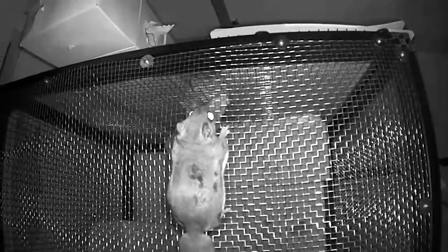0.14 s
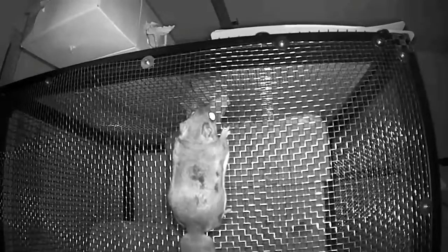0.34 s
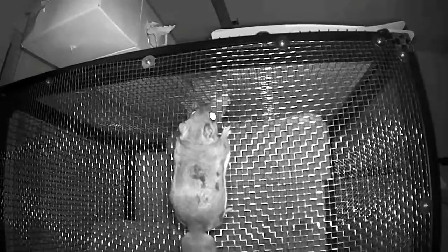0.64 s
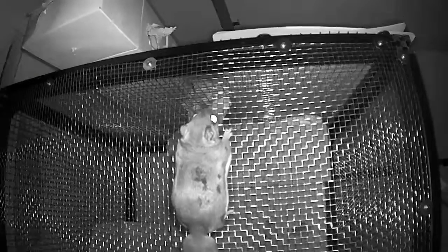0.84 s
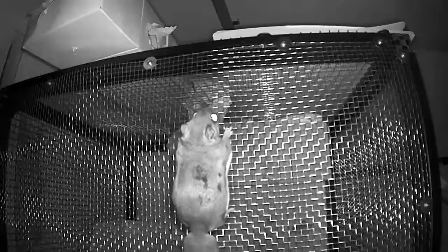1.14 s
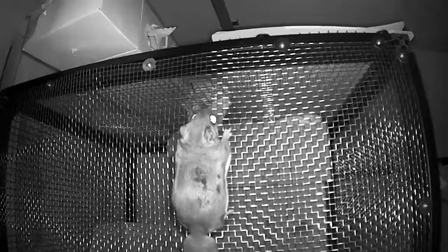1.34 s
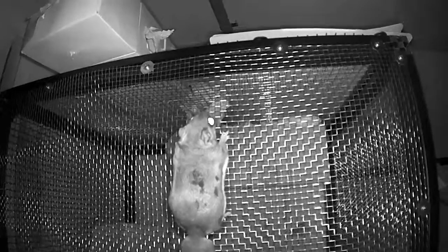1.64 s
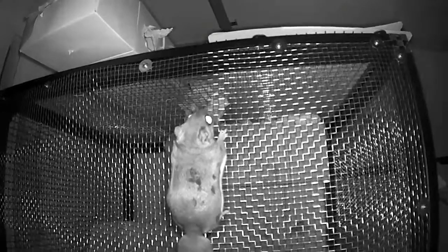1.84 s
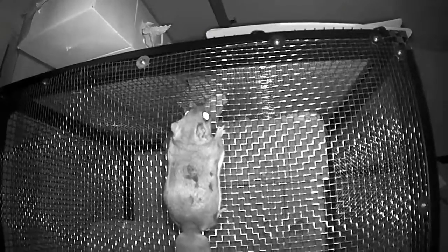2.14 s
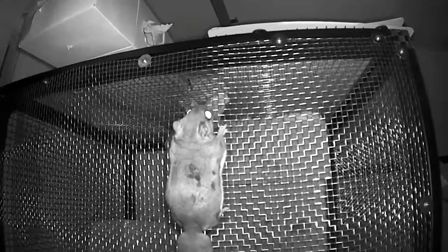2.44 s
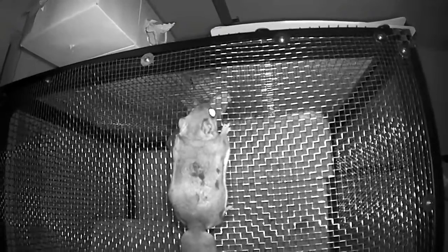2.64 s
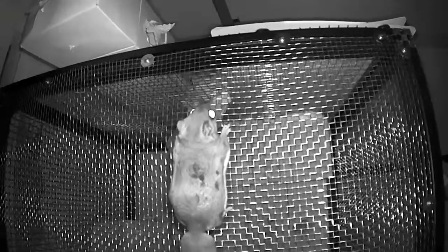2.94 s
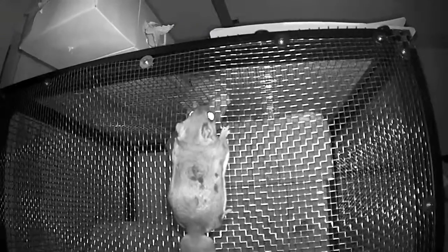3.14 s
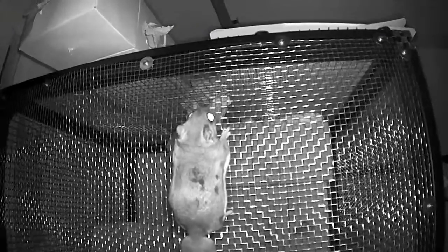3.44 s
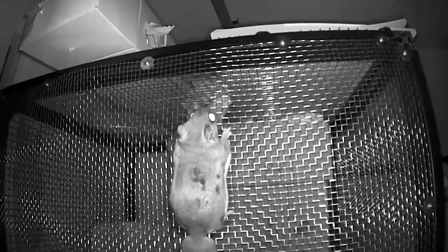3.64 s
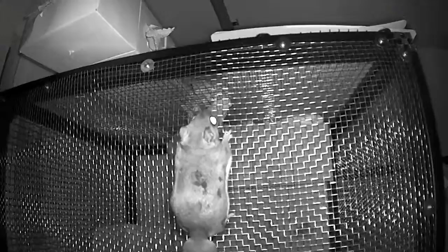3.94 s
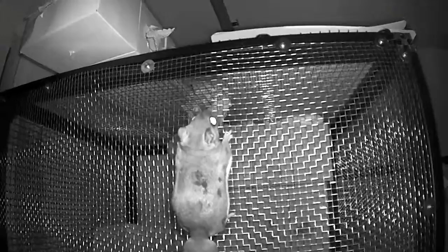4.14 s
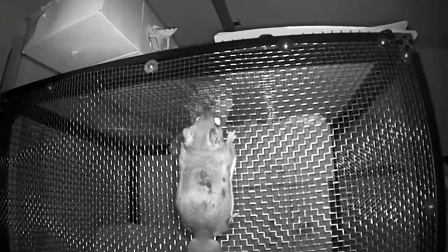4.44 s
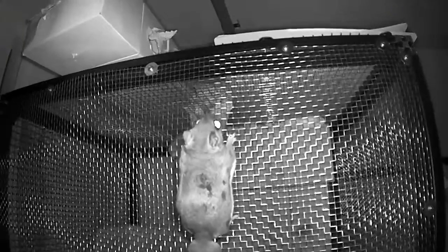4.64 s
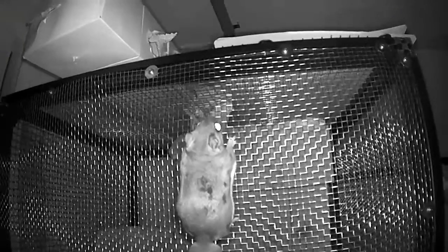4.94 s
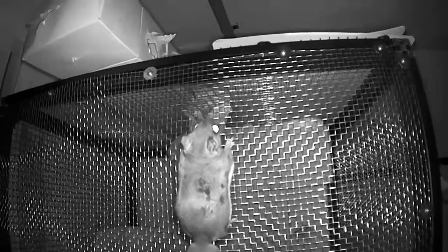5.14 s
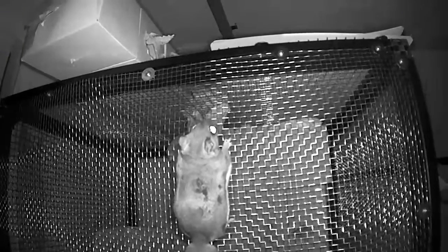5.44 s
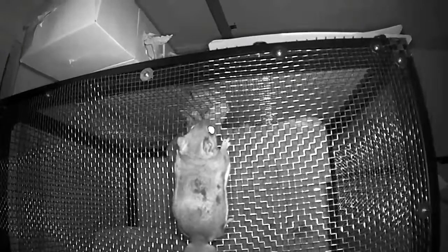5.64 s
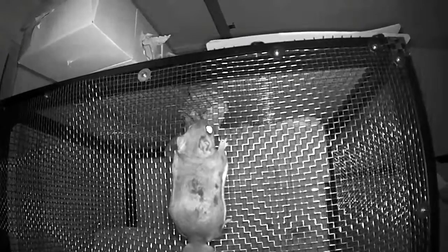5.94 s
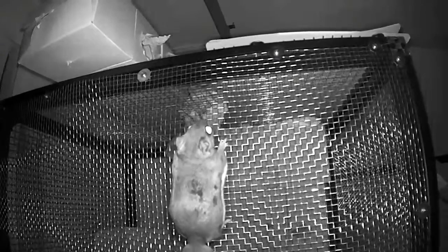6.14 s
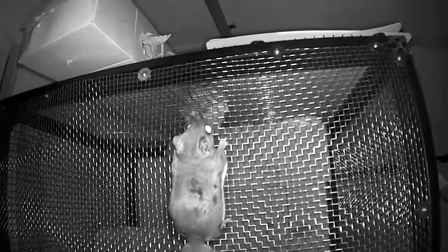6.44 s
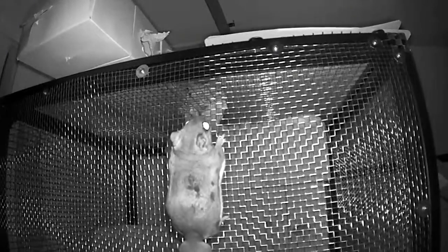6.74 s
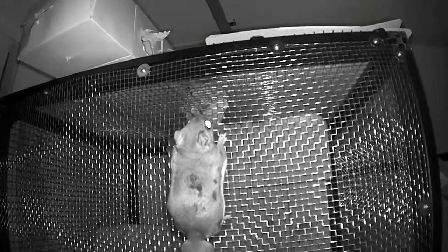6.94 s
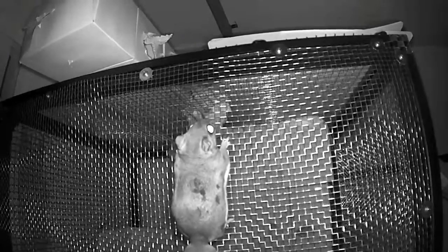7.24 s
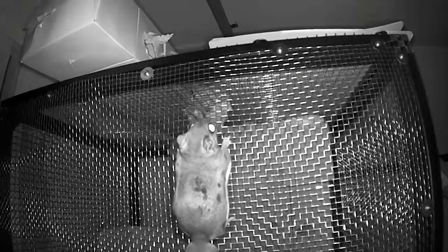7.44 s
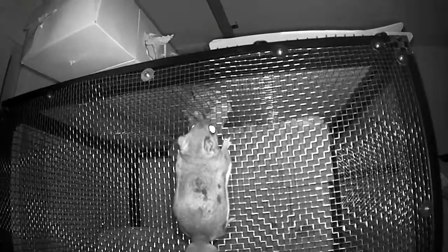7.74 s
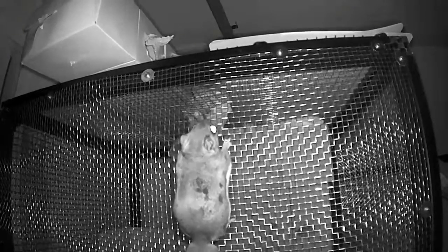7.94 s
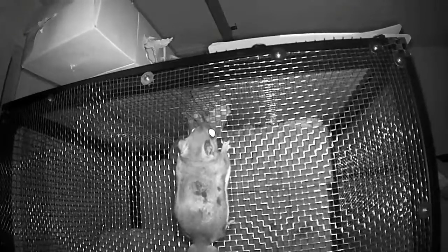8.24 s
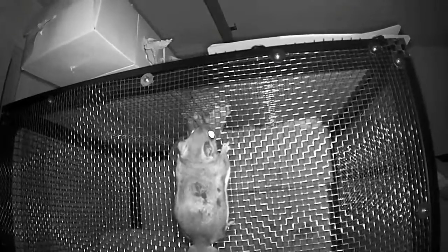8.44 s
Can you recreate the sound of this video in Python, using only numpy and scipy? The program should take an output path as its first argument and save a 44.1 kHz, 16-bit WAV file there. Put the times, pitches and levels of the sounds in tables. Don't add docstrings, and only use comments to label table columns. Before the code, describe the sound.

A quiet room is heard through a small camera microphone: soft bass-heavy hiss, a very faint steady whine and a low electrical buzz fluttering about fifteen times a second throughout. A small rodent close by on cage wire calls eight times, its sharp chirps ending near 0.5, 1.8, 2.8, 4.05, 5.1, 6.2, 7.05 and 8.15 seconds. Each begins around two tenths of a second earlier as thin, swelling, raspy hiss, gathers crackling ticks and a faint sinking whistle, then bursts into a bright swoop that plunges from very high to low in an instant, with short cage and wall echoes. Between and around calls, another animal gives tiny, faint, high whistles from farther away, clearer near 1.15, 2.2 and 7.95 seconds. Soft dull handling bumps come near 1.4 and 3.6 seconds. After the last chirp only the buzz and hiss remain.

```python
import sys
import numpy as np
from scipy import signal
from scipy.fft import rfft, irfft
from scipy.io import wavfile
from scipy.ndimage import uniform_filter1d

SR = 44100
rng = np.random.default_rng(int(sys.argv[2]) if len(sys.argv) > 2 else 0)


def pcm_store(signal):
    levels = np.round(np.clip(np.atleast_2d(signal), -1, 1) * 32767)
    wavfile.write(sys.argv[1], SR, levels.astype(np.int16).T)


def attenuation_scalar(level_db):
    decades = np.asarray(level_db, float) / 20
    return 10 ** decades


N = 378378
FRAME_HZ, FRAME_START_S = 15.008, .008
HOOK_FROM_HZ, HOOK_TO_HZ = 5200, 4580


def shaped(x, points):
    hz, level_db = np.transpose(points)
    grid = np.fft.rfftfreq(N, 1 / SR) + 1
    response_db = np.interp(np.log(grid), np.log(hz), level_db)
    return irfft(rfft(x) * attenuation_scalar(response_db), N)


def rms_one(x):
    return x / np.sqrt(np.mean(x ** 2))


def resonate(x, hz, width_hz):
    r = np.exp(-np.pi * width_hz / SR)
    poles = [1, -2 * r * np.cos(2 * np.pi * hz / SR), r * r]
    return signal.lfilter([(1 - r * r) / 2, 0, (r * r - 1) / 2], poles, x)


def whistle(out, rows, edge_s, rough):
    s, hz, level_db = np.transpose(rows)
    at = np.arange(round(s[0] * SR), round(s[-1] * SR))
    t = at / SR
    pitch_hz = uniform_filter1d(np.interp(t, s, hz), size=110, mode="nearest")
    fade = np.clip(np.minimum(t - s[0], s[-1] - t) / edge_s, 0, 1)
    wander = uniform_filter1d(uniform_filter1d(rng.standard_normal((2, 9000)), size=90), size=60)
    swing, shake = rough * rms_one(wander)[:, :len(t)]
    tone = (1 + swing) * np.sin(2 * np.pi * np.cumsum(pitch_hz) / SR + shake)
    level = np.sqrt(2) * attenuation_scalar(np.interp(t, s, level_db))
    return out + np.bincount(at, level * fade * tone, N)


def sinking_notes(table, rough, rise_db, fall_db):
    out = np.zeros(N)
    for s, length, from_hz, to_hz, level_db in table:
        onset = (s, from_hz, level_db - rise_db)
        bend = (s + .38 * length, .3 * from_hz + .7 * to_hz, level_db)
        release = (s + length, to_hz, level_db - fall_db)
        out = whistle(out, [onset, bend, release], .004, rough)
    return out


# pitch_hz, density_db (per Hz)
FLOOR_COLOUR = [(14, -1.5), (30, 3.5), (60, -4), (120, -13), (250, -19), (500, -22.5), (1100, -26.5),
                (3000, -26), (7000, -29), (9500, -31)]


def self_noise():
    return attenuation_scalar(-58.5) * rms_one(shaped(rng.standard_normal(N), FLOOR_COLOUR))


# centre_s, width_ms (signed by the push), level_db
BUMPS = [(1.3908, -1.5, -39.5), (1.3945, 1.6, -46), (1.403, 4, -48), (1.414, -1.5, -49), (1.436, -3, -45.5),
         (3.535, 1, -42), (3.551, 8, -49), (3.57, 2, -38.5), (3.588, 0, -40.5), (3.633, 2.5, -43),
         (3.652, -6, -49)]


def handling_bumps():
    t = np.arange(N) / SR
    return sum(np.sign(ms) * attenuation_scalar(db) * np.exp(-((t - s) * 1000 / ms) ** 2) for s, ms, db in BUMPS)


def coil_whine():
    t = np.arange(N) / SR
    whine_hz = 2462
    unsteady = .5 * rms_one(resonate(rng.standard_normal(N), whine_hz, 40))
    gate = uniform_filter1d(1. * ((t - FRAME_START_S) * FRAME_HZ % 1 < .78), size=90)
    return attenuation_scalar(-70.5) * (np.sin(2 * np.pi * whine_hz * t) + unsteady) * gate


# time_s, level_db
LOAD = [(0, -52.5), (.8, -52), (1.05, -56.5), (1.35, -52), (2.6, -51), (3.1, -53), (3.4, -51.5),
        (4.0, -54.5), (4.8, -51), (5.3, -55.5), (5.9, -51.5), (6.5, -54), (7.4, -51.5), (8.05, -52),
        (8.2, -57), (8.58, -54)]
# start_s, length_ms, level_db
KEY_JOBS = [
    (.849, 71, -53.3),
    (2.848, 49, -53),
    (4.555, 4, -57),
    (4.684, 4, -56),
    (4.754, 5, -55),
    (4.847, 43, -53),
    (6.856, 45, -58),
    (6.898, 25, -50.4),
]


def picture_jobs():
    k = np.arange(129)
    slot, late, long, loud = rng.standard_normal((len(k), 4)).T
    beat = np.cos(2 * np.pi * (k - 8.1) / 23.7)
    late_slot = beat + .45 * (-1.) ** k + .3 * slot > 0
    spread = .28
    ms = 10.3 * np.exp(spread * long)
    s = .0475 + k / FRAME_HZ + .0062 * late_slot + .001 * late - ms / 2000
    level_db = np.interp(s, *np.transpose(LOAD)) + 1.2 * loud - 5.0 * spread * long
    level_db -= 5 * sum((s > start) & (s < start + length) for start, length, _ in HOOKS)
    rows = np.transpose([s, ms, level_db])
    clear = [row for row in rows
             if all(not start - .02 < row[0] < start + length_ms / 1000 for start, length_ms, _ in KEY_JOBS)]
    return clear + KEY_JOBS


# pitch_hz, width_hz, level_db
BUZZ = [(796, 94, 2), (1418, 170, -19.5), (2333, 550, -11.5), (3450, 280, -18.5), (7420, 140, -26.5)]


def supply_buzz():
    t = np.arange(N) / SR
    busy = attenuation_scalar(-68.5) * ((t - FRAME_START_S) * FRAME_HZ % 1 < .1)
    for s, ms, db in picture_jobs():
        span = slice(round(s * SR), round((s + ms / 1000) * SR))
        busy[span] = np.maximum(busy[span], attenuation_scalar(db - 1.0))
    white = rng.standard_normal(N)
    bands = [rms_one(resonate(resonate(white, hz, width), hz, width)) for hz, width, _ in BUZZ]
    bands[0] /= np.sqrt(0.51 + uniform_filter1d(bands[0] ** 2, size=250))
    ringing = sum(attenuation_scalar(db) * band for band, (_, _, db) in zip(bands, BUZZ))
    return uniform_filter1d(busy, size=110) * (ringing + attenuation_scalar(-9) * white)


# delay_s, level_db
ECHOES = [(.0021, -9), (.0052, -9), (.0175, -15)]


def room(x):
    t60_s, tail_db = .155, -4
    t = np.arange(round(.3 * SR)) / SR
    response = rng.standard_normal(len(t)) * attenuation_scalar(-60 * t / t60_s) * np.clip(t / .006, 0, 1)
    response *= attenuation_scalar(tail_db) / np.sqrt(np.sum(response ** 2))
    for delay_s, level_db in ECHOES:
        response[round(delay_s * SR)] += attenuation_scalar(level_db)
    return signal.fftconvolve(x, response)[:N]


# pitch_hz, width_hz, level_db
HOUSING = [(2130, 280, -9.5), (4320, 400, -11), (7980, 1200, -6)]


def housing(x):
    return attenuation_scalar(-23) * x + sum(attenuation_scalar(db) * resonate(x, hz, width) for hz, width, db in HOUSING)


# start_s, length_s, from_hz, level_db
FAR_NOTES = [(.058, .017, 5000, -56), (.085, .08, 8000, -53), (.922, .067, 7950, -56.5),
             (1.085, .06, 5100, -57), (1.15, .061, 7950, -46.5), (1.99, .085, 7950, -60),
             (2.19, .03, 4900, -56), (2.222, .071, 7950, -45), (2.258, .032, 4330, -56),
             (3.09, .05, 7900, -57), (3.255, .021, 4940, -53), (3.3, .11, 7900, -50),
             (3.35, .032, 4280, -55.5), (3.822, .0096, 4030, -45.5), (4.4, .017, 8250, -52),
             (4.578, .055, 4880, -56), (4.622, .07, 7880, -51), (4.643, .023, 4310, -52),
             (5.37, .0078, 8080, -52), (5.53, .026, 5050, -60), (5.592, .043, 7800, -52),
             (5.604, .026, 4380, -51), (6.618, .045, 8100, -55.5), (6.815, .012, 4890, -54),
             (6.885, .022, 4250, -53), (7.705, .027, 7850, -59), (7.86, .079, 4940, -65),
             (7.94, .023, 4440, -46), (7.988, .011, 4050, -40)]


def distant_animal():
    sag = .045
    table = [(s, length, hz, hz * (1 - sag), db) for s, length, hz, db in FAR_NOTES]
    return attenuation_scalar(-4) * sinking_notes(table, rough=.75, rise_db=6, fall_db=6)


# after_start_s, level_db
SWELL = [(0, -75), (.016, -57), (.034, -52), (.07, -54)]
# pitch_hz, density_db (per Hz)
HISS_COLOUR = [(1000, -37.5), (1700, -24), (2130, -4.5), (2750, -16.5), (3650, -10), (4720, -6),
               (5100, -6.5), (6430, -0.5), (7900, 2), (10300, -34.5), (17400, -120)]
# start_s, crest_s, hiss_crest_db, hiss_end_db, rasp_crest_db
LEADS = [(.255, .44, -42, -40.5, -57), (1.55, 1.77, -43, -41, -60), (2.515, 2.705, -41, -50, -62),
         (3.795, 3.983, -46, -38, -58), (4.84, 5.04, -44.5, -57, -60), (5.93, 6.105, -42.5, -46, -56),
         (6.81, 6.95, -43.5, -47.5, -58), (7.915, 8.098, -44, -46.5, -64)]


def folded_hiss():
    t = np.arange(N) / SR
    swell_s, swell_db = np.transpose(SWELL)
    gain = np.zeros(N)
    for (start, crest, crest_db, end_db, _), (hook, _, _), (end, *_) in zip(LEADS, HOOKS, SWOOPS):
        s = [*(start + swell_s), hook, crest, end]
        gain += attenuation_scalar(np.interp(t, s, [*swell_db, -52, crest_db, end_db], -200, -200))
    hiss = rms_one(shaped(rng.standard_normal(N), HISS_COLOUR))
    return attenuation_scalar(-3.0) * uniform_filter1d(gain, size=200) * hiss


def slew_rasp():
    t = np.arange(N) / SR
    gain = np.zeros(N)
    for (start, crest, _, _, rasp_db), (end, *_) in zip(LEADS, SWOOPS):
        s = [start, crest - .025, crest, min(crest + .012, end), end + .001]
        gain += attenuation_scalar(np.interp(t, s, [-77, -77, rasp_db, rasp_db - 2, rasp_db - 14], -200, -200))
    slips = rng.standard_normal(N) * (rng.random(N) < 1500 / SR)
    rasp = rms_one(shaped(slips, [(100, -3.5), (400, 4), (2500, 0.5), (6000, -12.5)]))
    return attenuation_scalar(4) * uniform_filter1d(gain, size=200) * rasp


# time_s, peak_db
TICKS = [(.4413, -30), (.453, -24.5), (.4754, -35), (1.7719, -28), (1.7875, -32), (2.7053, -33),
         (2.7093, -29), (2.7359, -32), (3.9998, -33), (4.0045, -24.5), (4.0075, -28), (5.041, -34),
         (5.0615, -35), (6.1296, -33), (6.9879, -35), (8.1225, -31)]


def overload_crackle():
    rows = list(TICKS)
    draws = rng.standard_normal((len(HOOKS), 2, 20))
    for (hook, length, _), (end, *_), (gap, loud) in zip(HOOKS, SWOOPS, draws):
        s = hook + .012 + np.cumsum(.009 * np.exp(.4 * gap))
        rows += [(a, -38 + 2.0 * b) for a, b in zip(s, loud) if a < min(end, hook + length)]
    s, peak_db = np.transpose(rows)
    clicks = np.bincount((s * SR).astype(int), attenuation_scalar(peak_db + 22) * rng.choice([-1, 1], len(s)), N)
    return attenuation_scalar(-34) * clicks + resonate(clicks, 7600, 650) + attenuation_scalar(-9) * resonate(clicks, 6200, 1200)


def glides():
    out = np.zeros(N)
    level_db = -65 + np.array([3., 0, -2, -3])
    for (start, *_), (hook, *_) in zip(LEADS, HOOKS):
        s = start + 0.0099 + (hook - start - .012) * np.array([0, .4, .75, 1])
        rows = np.transpose([s, [7350, 6550, 6400, HOOK_FROM_HZ], level_db])
        out = whistle(out, rows, .004, rough=1.3)
    return out


# start_s, length_s, level_db
HOOKS = [(0.402, .06, -42), (1.733, .051, -41.5), (2.677, .047, -41.5), (3.959, .066, -42.5),
         (5.01, .062, -44.5), (6.084, .05, -40), (6.942, .058, -46), (8.089, .035, -45)]


def hooks():
    table = [(s, length, HOOK_FROM_HZ, HOOK_TO_HZ, db) for s, length, db in HOOKS]
    return sinking_notes(table, rough=.62, rise_db=14, fall_db=15)


# start_s, leave_s (drops through 8 kHz), middle_s (at 4.5 kHz), end_s, leave_db
SWOOPS = [(.4526, .509, .521, .539, -12.5), (1.7871, 1.802, 1.813, 1.834, -12.5),
          (2.7561, 2.764, 2.7755, 2.796, -9.5), (4.0036, 4.034, 4.051, 4.07, -14.5),
          (5.0941, 5.106, 5.117, 5.138, -13.5), (6.1381, 6.155, 6.174, 6.199, -14),
          (7.0031, 7.018, 7.041, 7.065, -12.5), (8.1211, 8.144, 8.158, 8.175, -12.5)]
TAIL_DB = [-34, -28.5, -24, -33, -31.5, -27.5, -29, -35]
# after_middle_s, pitch_hz, level_db
PLUNGE = [(-.0092, 7300, -15.5), (-.0042, 6150, -21), (0, 4450, -23), (.0085, 3350, -31)]


def swoops():
    out = np.zeros(N)
    for (start, leave, middle, end, leave_db), tail_db in zip(SWOOPS, TAIL_DB):
        breath_db = .3 * (tail_db + 29)
        plunge = [(middle + s, hz, db + (s >= 0) * breath_db) for s, hz, db in PLUNGE]
        leave = min(leave, plunge[0][0] - .001)
        perch_s = start + .004
        perch = [(perch_s, 8240, -25.5), (max(leave - .0065, perch_s), 8240, -25.5)]
        foot_s, foot_hz = middle + .016, 2100
        end_hz = foot_hz - 95000 * (end - foot_s)
        foot = [(foot_s, foot_hz, tail_db), (end, end_hz, tail_db - 10)]
        rows = [(start, 8800, -22), *perch, (leave, 7880, leave_db), *plunge, *foot]
        out = whistle(out, rows, .002, rough=.2)
    return out


def scene():
    camera = self_noise() + handling_bumps() + coil_whine() + supply_buzz()
    far = distant_animal()
    folded = folded_hiss() + overload_crackle()
    folded = folded + attenuation_scalar(-5) * room(folded) + slew_rasp()
    hook = hooks() + glides()
    near = swoops()
    mono = camera + room(0.49 * hook + far) + folded + hook + housing(near + room(near))
    return np.array([mono, mono])


def roll_off(x):
    return signal.sosfilt(signal.butter(12, 8970, fs=SR, output="sos"), x)


# pitch_hz, level_db
SMOOTHING = [(7900, 0), (8010, -2.5), (8096, -7), (8183, -16), (8269, -29), (8355, -44), (8450, -60),
             (8650, -95)]


def record(dry):
    below = signal.sosfilt(signal.butter(8, 9500, fs=SR, output="sos"), dry[0])
    sampler = 1 + 2 * np.cos(2 * np.pi * 16000 * np.arange(N) / SR)
    mono = shaped(below * sampler, SMOOTHING)
    level = np.sqrt(uniform_filter1d(mono ** 2, size=1500) + 1e-14)
    colour = [(300, -4.5), (2000, -4.5), (5000, -0.5), (7000, 7)] + SMOOTHING[2:]
    excess = np.clip(level / attenuation_scalar(-55.5) - 1, 0, 1)
    apart = attenuation_scalar(-35.5) * level * excess * shaped(rng.standard_normal(N), colour)
    both = mono + attenuation_scalar(-104) * rng.standard_normal(N) + 0.00018
    return roll_off(np.array([both + apart, both - apart]))


dry = scene()
out = record(dry)
pcm_store(out)
```